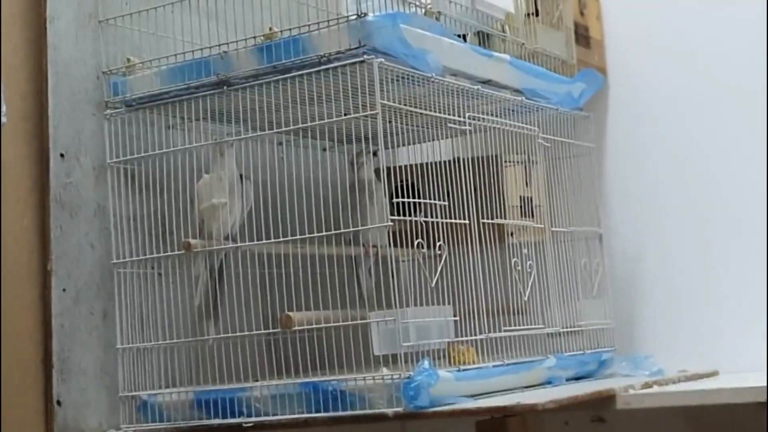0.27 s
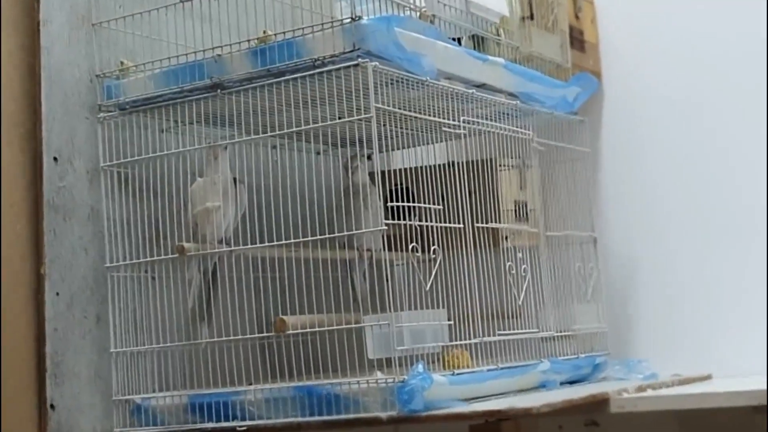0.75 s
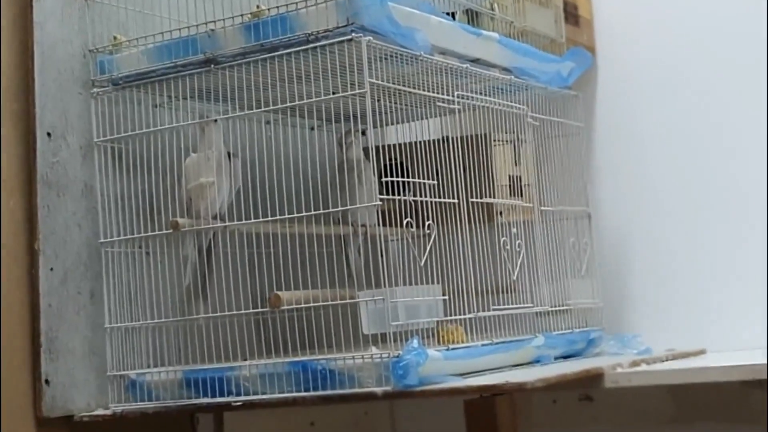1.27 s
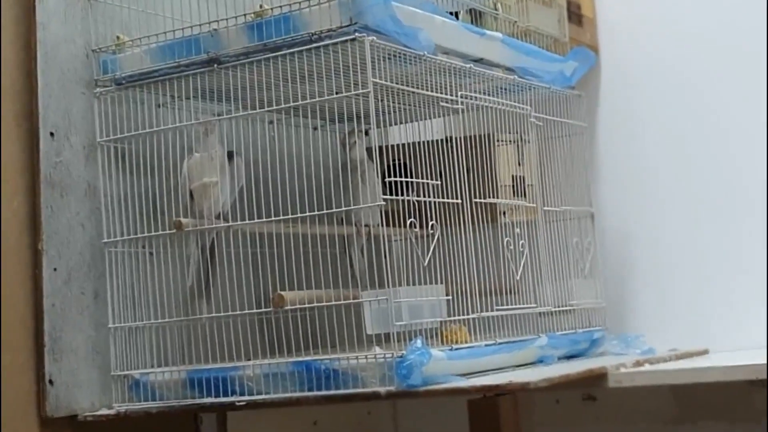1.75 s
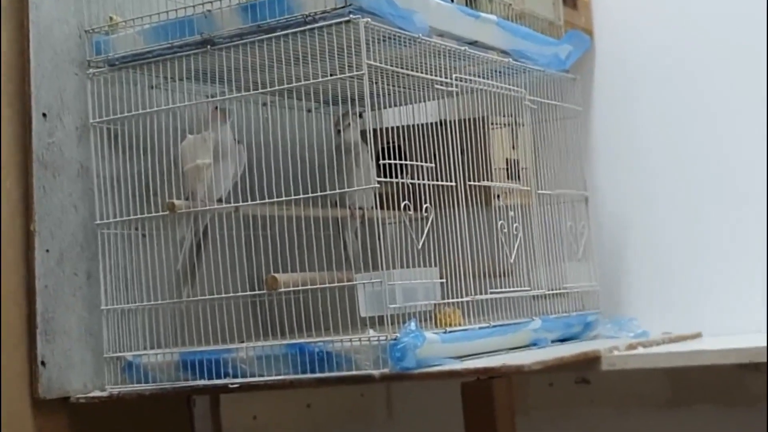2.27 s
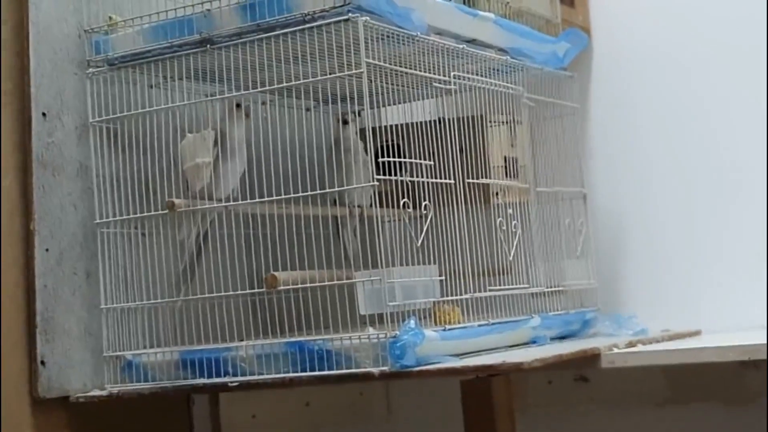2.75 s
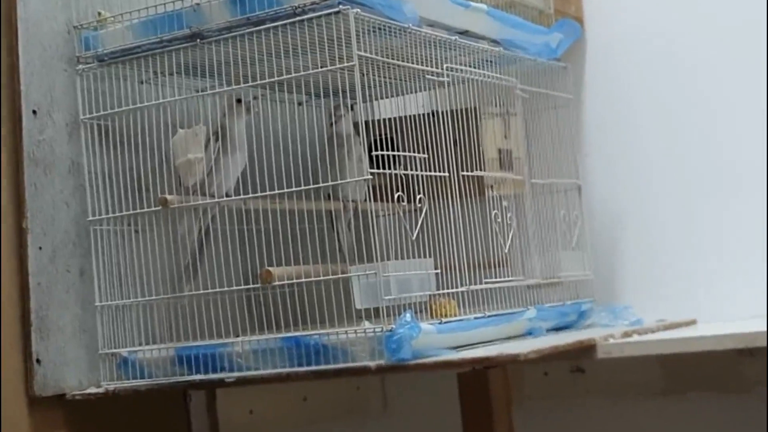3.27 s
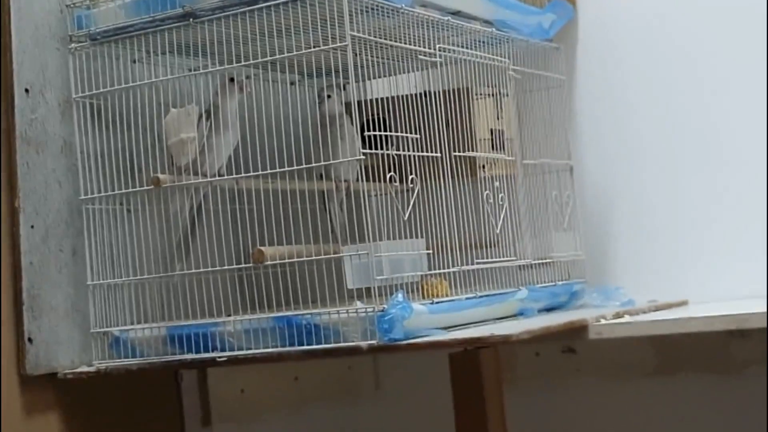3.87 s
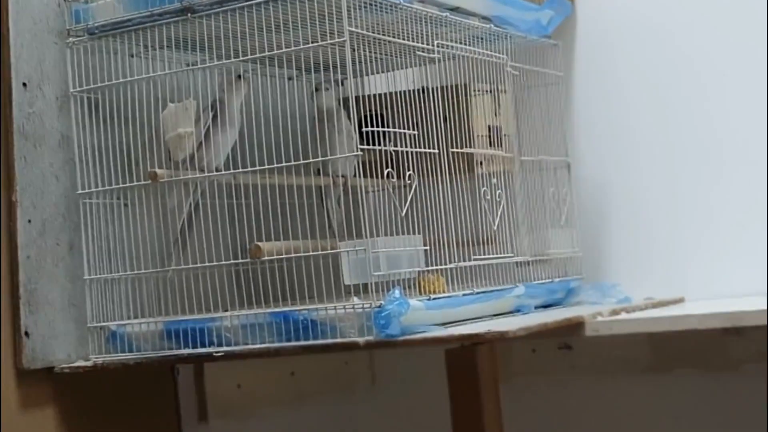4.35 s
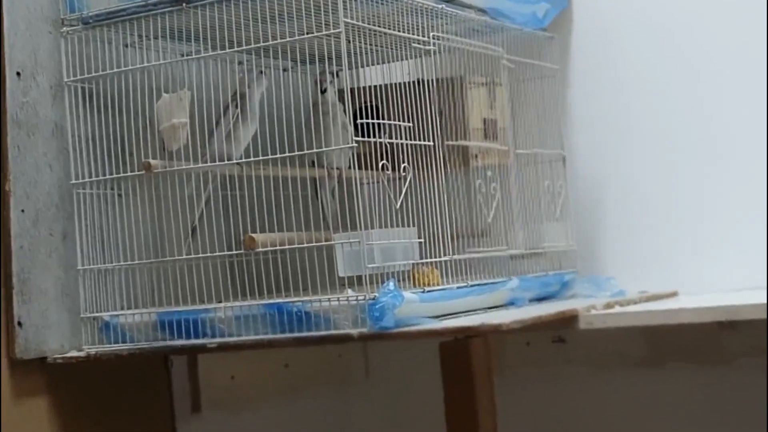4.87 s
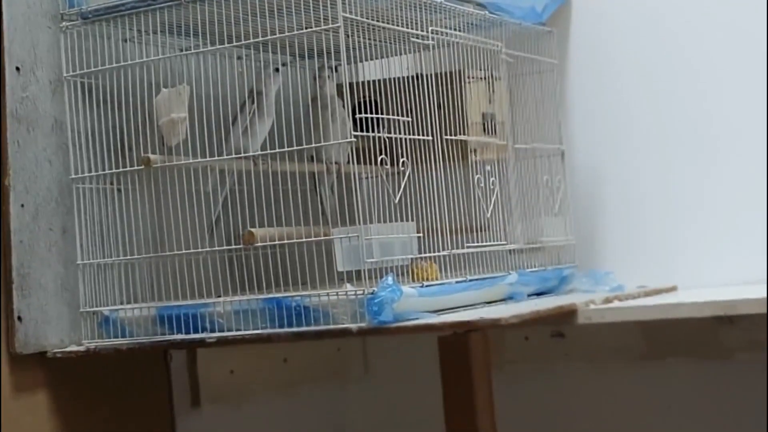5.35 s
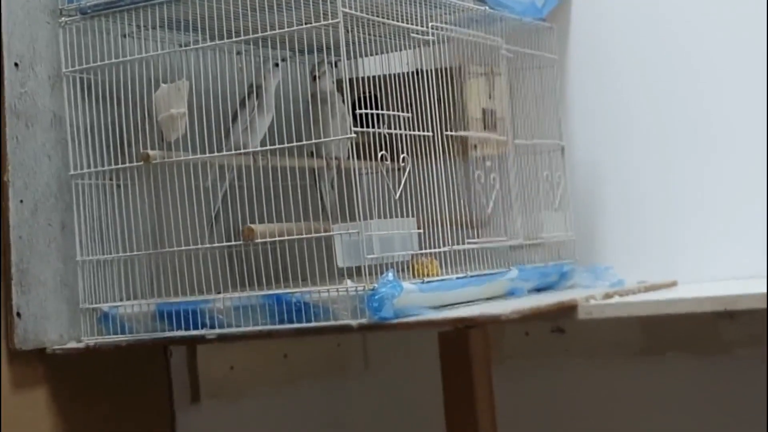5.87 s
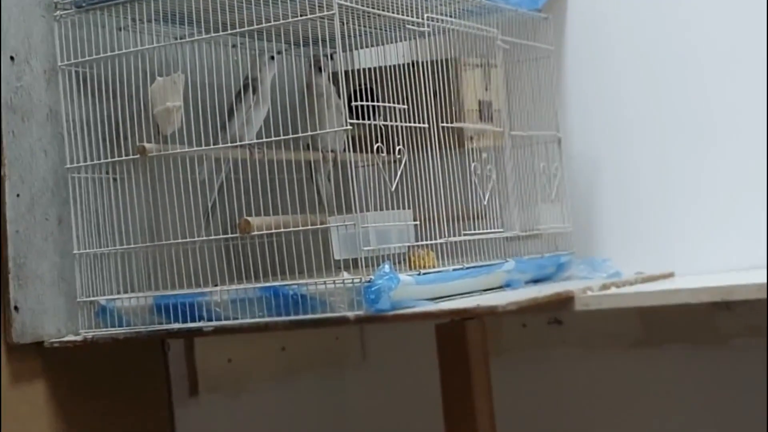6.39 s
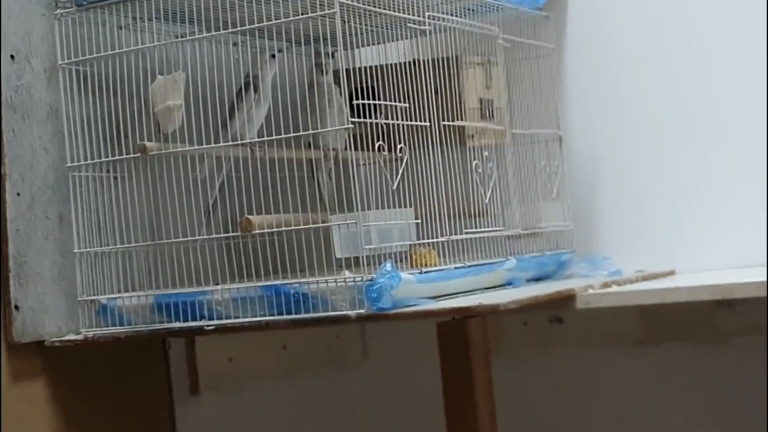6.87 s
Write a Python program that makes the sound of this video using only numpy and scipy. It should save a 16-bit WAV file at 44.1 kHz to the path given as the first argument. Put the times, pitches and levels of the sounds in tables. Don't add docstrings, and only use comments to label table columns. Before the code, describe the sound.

Over faint low rumble and pulsing hum, a distant door thuds, then one pet bird chirps a bright, quick, ringing song indoors.

```python
import sys
import numpy as np
from scipy import signal
from scipy.fft import rfft, irfft
from scipy.io import wavfile

SR = 44100
rng = np.random.default_rng(int(sys.argv[2]) if len(sys.argv) > 2 else 0)


def convert_level_to_amplitude(level_db):
    exponent = np.asarray(level_db, float) / 20
    return 10 ** exponent


def master_out(mix):
    frames = np.transpose(np.atleast_2d(mix))
    ceiling = np.clip(frames, -1, 1)
    pcm = np.round(ceiling * 32767).astype(np.int16)
    wavfile.write(sys.argv[1], SR, pcm)


N = 313992

# (frequency [Hz], density [dB per Hz])
RUMBLE_SPECTRUM = [(12, -28), (20, -4.5), (60, -14), (96, -8.5), (285, -12), (347, -20.5), (434, -13.5),
                   (499, -24.5), (558, -20), (1860, -32), (5230, -49), (6010, -46), (8890, -61.5),
                   (12800, -58.5), (16000, -68)]
# (frequency [Hz], likeness [0-1])
LIKENESS = [(60, 0.91), (180, 1), (550, 0.48), (1650, .1), (4970, .1), (15000, 0.31)]
# (frequency [Hz], difference [dB])
TILT = [(60, -1.5), (240, -0.5), (950, -0.5), (3770, -9), (15000, 1.5)]
# (frequency [Hz], rms level [dB])
HUM = [(57.6, -53), (102.3, -54.5), (146.5, -52.5), (441.4, -58.5)]
# (frequency [Hz], density [dB per Hz])
DOOR_SPECTRUM = [(24, -43), (40, -13.5), (107, -2.5), (180, -15), (274, -14), (315, -15.5), (543, -16),
                 (869, -29), (1500, -40), (1950, -36), (3300, -120)]
# (frequency [Hz], gain [dB])
BEAK = [(1000, -8), (2300, 13), (4500, -2.5), (6200, -8), (7600, -18.5), (8600, -16), (9800, -19.5),
        (12200, 3.5), (14500, -2), (16000, 3.5)]
# (frequency [Hz], gain [dB])
RASP = [(1000, -22.5), (2300, -6.5), (3000, 3.5), (7400, -2), (8400, -32.5), (9800, -44.5), (11500, -17),
        (14500, -25.5), (16000, -24.5)]
# (time [s], peak level [dB])
TICKS = [
    (2.631, -56),
    (4.3221, -57.5),
]
# (frequency [Hz], T60 [s])
ROOM_T60 = [(500, 0.84), (2000, 0.56), (4000, 0.61), (6500, 0.44), (12000, 0.36)]

# (start [s], time to the pitch turn [s], low pitch [Hz], top pitch [Hz], level [dB])
SQUAWKS = [
    (1.193, .062, 1316, 1613, -20),
    (1.655, .065, 1275, 1875, -16.5),
]
SLIDES = [
    (1.9, 0.033, 1441, 1935, -21),
    (2.03, 0.032, 1330, 1450, -32),
    (2.188, .018, 1376, 1527, -22.5),
]
COOS = [
    (2.238, 0.067, 1389, 1527, -22),
    (5.54, .09, 1284, 1424, -33.5),
]
CHIRPS = [
    (2.684, 0.071, 1757, 2139, -11.5),
    (3.25, 0.14, 1780, 2150, -13),
    (3.865, 0.1, 1780, 2028, -11.5),
    (4.385, .115, 1813, 2212, -11),
    (4.92, 0.14, 1858, 2146, -12.5),
]
WHISTLES = [
    (2.427, 0.074, 1823, 1978, -17),
    (2.95, 0.079, 2206, 2490, -22),
    (3.56, 0.081, 2163, 2583, -19.5),
    (4.122, 0.091, 2323, 2545, -16),
    (4.64, .096, 2263, 2517, -14),
    (5.175, .094, 2204, 2488, -12),
]

# (stage [0 start, 1 turn, 2 end], tension [-1 slack, 0 low, 1 top], level [dB],
# second harmonic re first [dB])
SQUAWK = [(0, 0.01, -23.5, -2), (0.501, 0.12, -16.5, 0.5), (0.821, .8, 1, -7), (1, 1, -8.5, -18),
          (2, 0.14, -6.5, -14)]
SLIDE = [(0, 1, -8.5, -34.5), (.45, .45, -7, -26.5), (1, -0.11, -12.7, -25), (1.75, -0.22, -7, -29),
         (2, -1.3, -7, -22.5)]
COO = [(0, 0.01, -3, -19.5), (.3, .1, -4.5, -25), (.65, .7, -2.1, -21.5), (1, 1, 0, -30),
       (2, -.3, -11.5, -17)]
CHIRP = [(0, .15, -16.5, -19), (.25, 0.024, -3.5, -15), (0.499, .3, -1, -9), (.75, .68, -4.5, -8),
         (1, 1, 3.64, -20), (1.5, 1.01, -9, -25.5), (2, .96, -5, -25.5)]
WHISTLE = [(0, 0.83, -16.5, -30.5), (.32, -0.088, -13, -29.5), (.6, 0.75, -10.5, -27),
           (.82, 1.1, -3.5, -36), (1, .75, 1.4, -31), (1.999, -1, -21, -39.5)]

# (fall per higher harmonic [dB], sheen above 8 kHz [dB], half-order lines at onset [dB],
# rasp at onset [dB], drift of upper harmonics [dB/s])
SONG = [
    (SQUAWKS, SQUAWK, (0.02, 0, 0), (-1, -15, -10.5, 1, -8)),
    (SLIDES, SLIDE, (0, .9, 0), (-3.5, 10, -9, -10, -32)),
    (COOS, COO, (.018, 0, 0), (-5, 16.5, -8, -11, 8)),
    (CHIRPS, CHIRP, (.14, -1, 1), (-5, 2.5, -11, -23, -130)),
    (WHISTLES, WHISTLE, (.025, 0, 0), (-3.5, -4.5, -17, -5, 110)),
]

RUMBLE_DB = -44.5
NULL_HZ, NULL_WIDTH_HZ, NULL_DB = 136, 5.8, -20.5
THROB_HZ, THROB_DB = 48, -40.5
BEAT_S, BEAT_TOP_S, UNEVEN = 1.416, .82, .17
THUD_S, THUD_DB, THUD_RISE_S, THUD_FALL_DB_S = 0.406, -28.5, 0.078, -53
BOOM_DB, BOOM_S, BOOM_HZ = -39, 0.42, 222
SLACK_HZ = 1320
PUSH_S = .118
ROOM_DB, ROOM_LIKENESS = -7, 0.29
EARLY_DB, EARLY_T60_S = -2, 0.18
BIRD_PAN_DB, BIRD_LEAD_S = -5.5, .00012
PEAK, CUTOFF_HZ = .96, 15850


def rms_one(x):
    return x / np.sqrt(np.mean(x ** 2) + 1e-20)


def at_hz(points, hz):
    table = np.array(points)
    return np.interp(np.log(hz), np.log(table[:, 0]), table[:, 1])


def drift(rate_hz, size):
    pole = np.exp(-2 * np.pi * rate_hz / SR)
    settle = 20000
    noise = rng.standard_normal(size + settle)
    return rms_one(signal.lfilter([1], [1, -2 * pole, pole * pole], noise)[settle:])


def stereo_noise(spectrum):
    hz = np.fft.rfftfreq(N, 1 / SR) + 1
    mid, side = rfft(rng.standard_normal((2, N)))
    alike = np.clip(at_hz(LIKENESS, hz), 0, 1)
    pair = np.sqrt(1 + alike) * mid + np.sqrt(1 - alike) * side * [[1], [-1]]
    lean = convert_level_to_amplitude(at_hz(TILT, hz) / 2 * np.array([[1], [-1]]))
    null = convert_level_to_amplitude(NULL_DB * np.exp(-((hz - NULL_HZ) / NULL_WIDTH_HZ) ** 2))
    return rms_one(irfft(pair * lean * null * convert_level_to_amplitude(at_hz(spectrum, hz)), N))


def rumble():
    return convert_level_to_amplitude(RUMBLE_DB + 0.25 * drift(3.7, N)) * stereo_noise(RUMBLE_SPECTRUM)


def motor():
    t = np.arange(N) / SR
    hum = 0
    for hz, db in HUM:
        hum = hum + convert_level_to_amplitude(db + 0.71 * drift(2.4, N)) * np.sin(2 * np.pi * hz * t)
    beat = np.cos(np.pi * (t - BEAT_TOP_S) / BEAT_S) + UNEVEN
    throb = convert_level_to_amplitude(THROB_DB + 0.54 * drift(5.5, N)) * beat * np.sin(2 * np.pi * THROB_HZ * t)
    return np.sqrt(2) * (hum + throb) * convert_level_to_amplitude(np.array([[-.8], [.8]]))


def door():
    t = np.arange(N) / SR - THUD_S
    rise = np.clip(1 + t / THUD_RISE_S, 0, 1) ** 2
    noise = stereo_noise(DOOR_SPECTRUM)
    thud = convert_level_to_amplitude(THUD_DB + THUD_FALL_DB_S * np.maximum(t, 0)) * noise
    dull = signal.lfilter(*signal.butter(2, BOOM_HZ, fs=SR), noise)
    boom = convert_level_to_amplitude(BOOM_DB) * np.clip((BOOM_S - t) / 0.08, 0, 1) * dull
    return rise * (thud + boom)


def claws():
    out = np.zeros(N)
    size = 882
    fall_db = 1500 * np.arange(size) / SR
    for start_s, peak_db in TICKS:
        start = round(start_s * SR)
        out[start:start + size] = convert_level_to_amplitude(peak_db + 2.0 - fall_db) * rng.standard_normal(size)
    return signal.sosfilt(signal.butter(2, 6000, "high", fs=SR, output="sos"), out)


def gesture(row, shape, timing):
    start_s, rise_s, low_hz, top_hz, level_db = row
    after_s, share, own_breath = timing
    stage, tension, db, second_db = np.transpose(shape)
    length_s = rise_s + max(after_s + share * rise_s, .008)
    pitch_s = np.interp(stage, [0, 1, 2], [0, rise_s, length_s])
    breath_s = np.interp(stage, [0, 1, 2], [0, PUSH_S if own_breath else rise_s, length_s])
    s = np.union1d(pitch_s, breath_s)
    pitch_hz = low_hz + tension * np.where(tension < 0, low_hz - SLACK_HZ, top_hz - low_hz)
    return np.transpose([start_s + s, np.interp(s, pitch_s, pitch_hz),
                         level_db + np.interp(s, breath_s, db), np.interp(s, breath_s, second_db)])


def note(rows, fall_db, sheen_db, half_db, rasp_db, upper_db_s, waver, flutter_db, settle_db_s):
    s, pitch_hz, level_db, second_db = np.transpose(rows)
    t = np.arange(s[0], s[-1] + 0.0029, 1 / SR)
    since = t - t[0]
    hz = np.interp(t, s, pitch_hz) * (1 + waver * drift(80, size=9000)[:len(t)])
    phase = 2 * np.pi * np.cumsum(hz) / SR
    second = np.interp(t, s, second_db)
    unsettled = second + settle_db_s * since
    loud = level_db + second_db
    steady = np.interp(t, s, np.mean(loud) + 1.1 * (loud - np.mean(loud)) - level_db)
    tone = np.sin(phase)
    for k in np.arange(2, 13):
        colour = at_hz(BEAK, k * hz) + sheen_db * np.clip(k * hz / 3000 - 2, 0, 1)
        strength = second if k < 4 else steady + upper_db_s * since
        audible = k * hz < SR / 2.5
        tone += convert_level_to_amplitude(strength + fall_db * (k - 3.0) + colour) * audible * np.sin(k * phase + k * k)
    for k in np.arange(.5, 9):
        line_db = unsettled + half_db + at_hz(BEAK, k * hz) - 10 * (k < 2) - 2.2 * k
        tone += convert_level_to_amplitude(line_db) * np.sin(k * phase + k)
    bins_hz = np.fft.rfftfreq(len(t), 1 / SR) + 1
    puffs = rng.standard_normal(size=9000)[:len(t)] * (1 + np.sin(phase))
    air = rms_one(irfft(rfft(puffs) * convert_level_to_amplitude(at_hz(RASP, bins_hz)), len(t)))
    tone += convert_level_to_amplitude(unsettled + rasp_db) * air
    edge = np.clip(since / 0.001, 0, 1) * np.clip((t[-1] - t) / 0.0024, 0, 1)
    flutter = flutter_db * drift(35, size=9000)[:len(t)]
    return np.sqrt(2) * convert_level_to_amplitude(np.interp(t, s, level_db) + flutter) * edge * tone


def bird():
    song = np.zeros(N)
    for notes, shape, timing, voice in SONG:
        for row in notes:
            rows = gesture(row, shape, timing)
            sound = note(rows, *voice, waver=0.0045, flutter_db=3.0, settle_db_s=-170)
            start = round(rows[0][0] * SR)
            song[start:start + len(sound)] += sound
    return song * convert_level_to_amplitude(-5.0) + claws()


def room(x):
    t = np.arange(round(.8 * SR)) / SR
    left, shared, right = rng.standard_normal((3, len(t)))
    white = np.sqrt(ROOM_LIKENESS) * shared + np.sqrt(1 - ROOM_LIKENESS) * np.array([left, right])
    tail = 0
    edges_hz = 500 * 2 ** np.arange(0, 5.4, .5)
    for low, high in zip(edges_hz, edges_hz[1:]):
        band = signal.sosfilt(signal.butter(2, [low, high], "band", fs=SR, output="sos"), white)
        tail = tail + band * convert_level_to_amplitude(-60 * t / at_hz(ROOM_T60, np.sqrt(low * high)))
    tail = tail * np.clip(t / 0.0076, 0, 1)
    early = white[:, ::-1] * convert_level_to_amplitude(-60 * t / EARLY_T60_S) * np.clip(t / 0.0039, 0, 1)
    early = signal.lfilter([1, .45], [1], early)
    echo = (convert_level_to_amplitude(ROOM_DB) * rms_one(tail) + convert_level_to_amplitude(EARLY_DB) * rms_one(early)) / np.sqrt(len(t))
    echo[0, 0] += 1
    echo[1, round(BIRD_LEAD_S * SR)] += 1
    pan = convert_level_to_amplitude(BIRD_PAN_DB / 2 * np.array([[1], [-1]]))
    return signal.fftconvolve(x[None], echo, axes=1)[:, :N] * pan


def scene():
    return rumble() + motor() + door() + room(bird())


def band_limit(x):
    return signal.sosfilt(signal.butter(12, 16410, fs=SR, output="sos"), x)


def record(dry):
    rounded = dry / (1 + (dry / PEAK) ** 16) ** (1 / 16)
    cut = signal.sosfilt(signal.ellip(10, 1, 70, CUTOFF_HZ, fs=SR, output="sos"), rounded)
    return band_limit(cut)


dry = scene()
out = record(dry)
master_out(out)
```